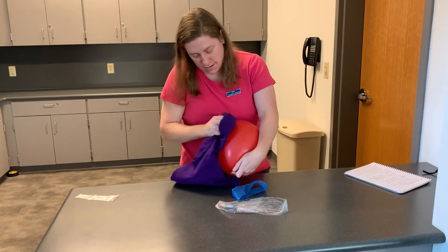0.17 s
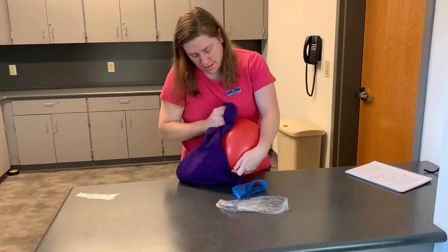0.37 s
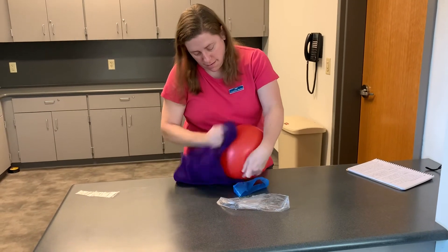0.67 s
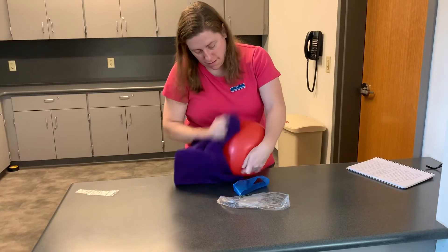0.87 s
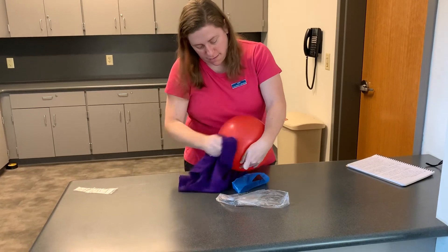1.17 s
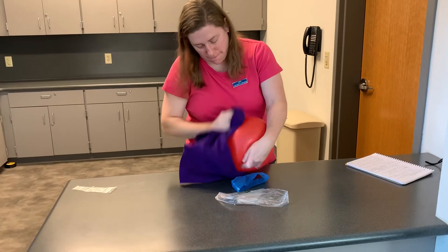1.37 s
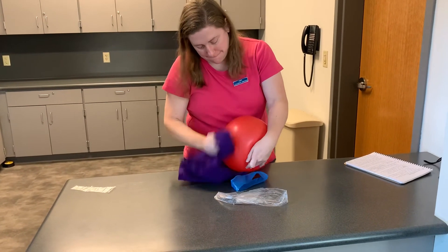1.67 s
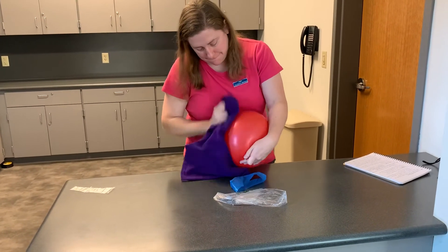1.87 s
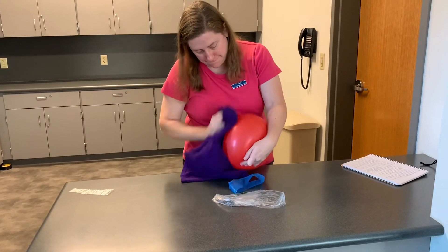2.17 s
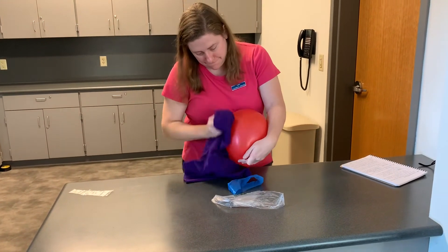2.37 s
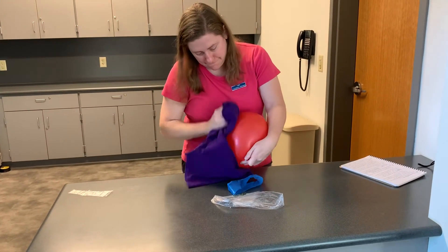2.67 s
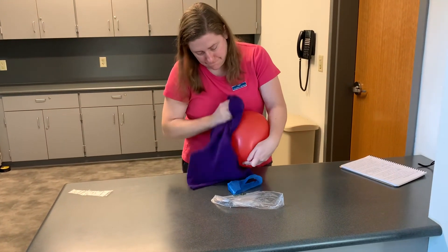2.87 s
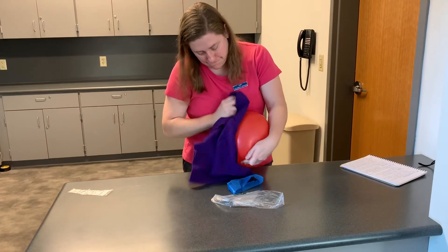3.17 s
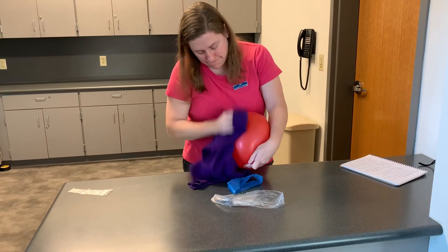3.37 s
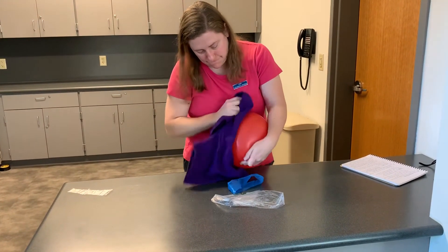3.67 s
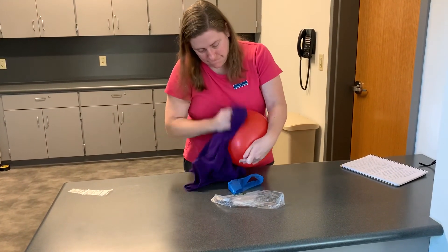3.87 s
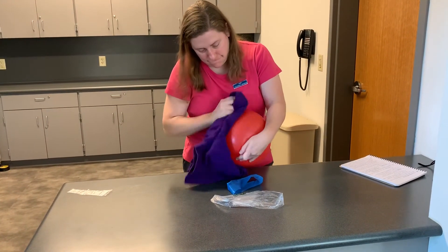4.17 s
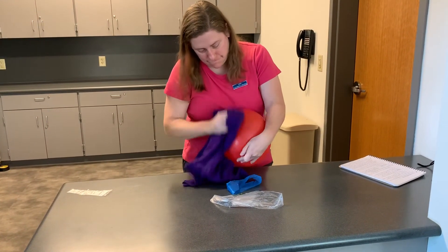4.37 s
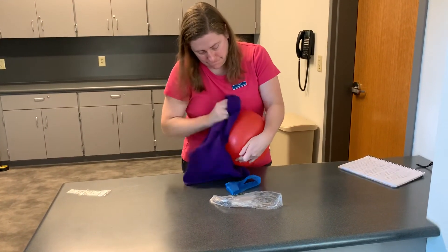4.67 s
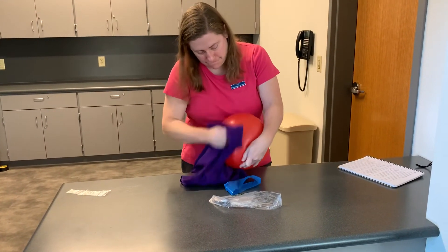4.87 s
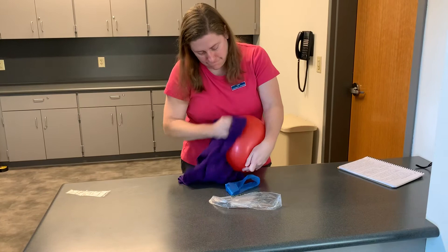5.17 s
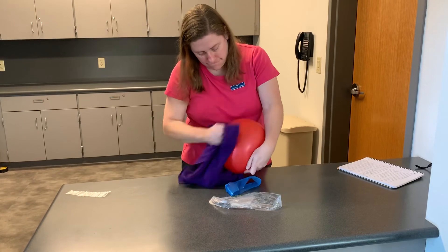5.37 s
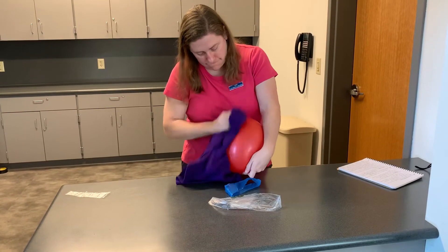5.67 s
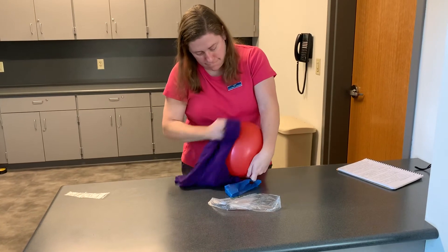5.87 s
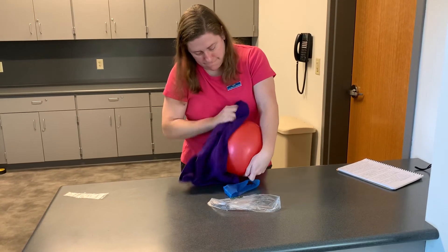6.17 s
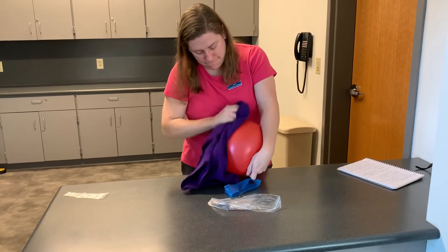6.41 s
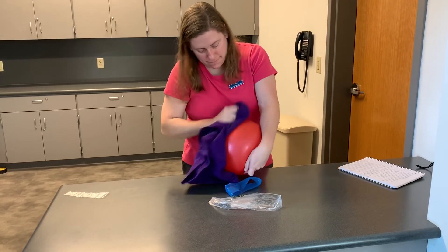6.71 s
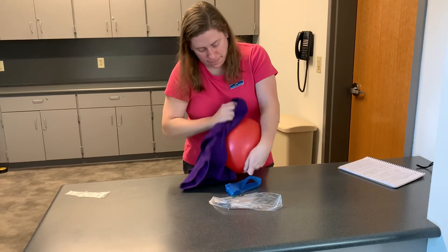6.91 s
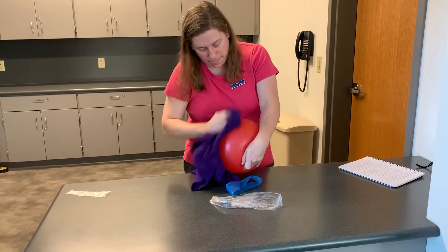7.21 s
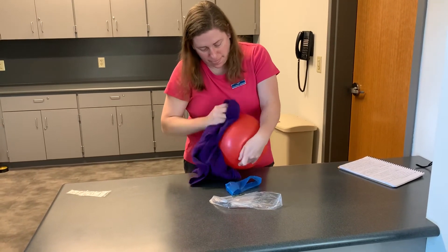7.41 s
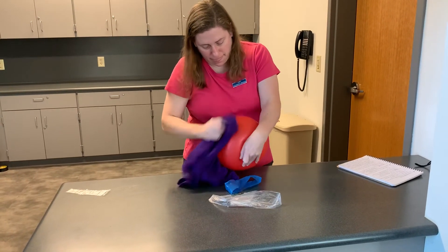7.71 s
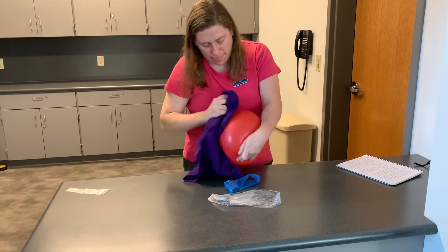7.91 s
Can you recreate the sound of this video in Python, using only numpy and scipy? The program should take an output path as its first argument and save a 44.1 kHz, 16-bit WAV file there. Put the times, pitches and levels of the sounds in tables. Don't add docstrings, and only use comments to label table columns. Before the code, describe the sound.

From 0 to 8 seconds a fleecy towel is rubbed without pause over an inflated balloon, close to a small stereo microphone in a hard kitchen. Soft, bright hissing strokes swing to and fro about eight times a second, uneven in strength, with a hollow scraping and kneading resonance from the taut skin. The opening is a little firmer and quicker, with dull knocks near 0.05, 0.35 and 0.9 seconds, then 1.4 and 2.2. From about 2.2 to 6.8 the loose towel end flaps more often, in low lumpy flutters, while lighter bumps pepper the strokes, clearer around 3.3 and 5.4. The strokes soften slightly late; the strongest hollow knocks land at 7.0 and 7.7. Rubbing continues to the cut. Beneath lie steady ventilation rumble, a short room echo and a barely audible thin electronic whine, swelling near 2.3 and 4.3.

```python
import sys
import numpy as np
from scipy import signal
from scipy.fft import rfft, irfft, next_fast_len
from scipy.io import wavfile
from scipy.ndimage import uniform_filter1d, map_coordinates

SR = 44100
rng = np.random.default_rng(int(sys.argv[2]) if len(sys.argv) > 2 else 0)


def wav_record(signal):
    frames = np.transpose(np.atleast_2d(signal))
    bounded = np.clip(frames, -1, 1)
    quanta = np.round(bounded * 32767).astype(np.int16)
    wavfile.write(sys.argv[1], SR, quanta)


def nominal_scale(level):
    x = np.asarray(level, float) / 20
    return 10 ** x


N = 355004
TIME = np.arange(N) / SR

# middle_s, hiss_db, length_ms, pressure_db
RUBS = [(0.061, -44.0, 47, 4), (0.154, -48.5, 49, 0.4), (0.252, -60, 39, 11), (0.355, -40.5, 37.6, 2.5),
        (0.454, -51.5, 81, 1), (0.576, -45.0, 48, -3.5), (0.708, -47, 46, 1), (0.804, -47, 49, -5),
        (0.921, -43, 38, 3.5), (1.03, -45, 50, -0.1), (1.158, -46.5, 44, 3.8), (1.274, -43, 55, 4.4),
        (1.438, -46, 50, 0.2), (1.558, -44, 57, -2.2), (1.688, -46, 63, 3), (1.812, -48.5, 79, -2),
        (1.964, -47.5, 72, 1.3), (2.094, -44.5, 53, -1.5), (2.238, -46.0, 41, 5), (2.369, -48.5, 65, 1),
        (2.516, -54.5, 46, 6.5), (2.621, -46.0, 54, 2.8), (2.754, -50, 40, 7), (2.874, -47.5, 58, 2.5),
            (3.014, -48.5, 58, 1), (3.137, -45.0, 47, 4.5), (3.279, -46, 57, -1.2), (3.406, -46.0, 51, 0),
            (3.532, -49.5, 51, 0.5), (3.652, -43.5, 47, -3.1), (3.782, -46.5, 46, 2),
            (3.894, -46.5, 56, -1.5), (4.038, -47.5, 47, 0), (4.142, -45.5, 54, -4), (4.279, -43.0, 46, 0),
            (4.406, -44.5, 60, 0.7), (4.551, -46.5, 43, 0.2), (4.668, -44, 54, 1.0), (4.817, -47.5, 52, 2),
            (4.952, -46.5, 69, 2),
        (5.106, -48.0, 56, -0.7), (5.224, -45.0, 57, 0.2), (5.346, -49.0, 50, 2.5),
         (5.444, -44.0, 57, -1.7), (5.585, -50.1, 52, 2), (5.702, -44.5, 56, -2.5), (5.833, -55, 34, 2.5),
         (5.943, -45, 52, -6.5), (6.061, -50, 53, -4.1), (6.172, -44.5, 53, -4), (6.304, -49.5, 48, -0.2),
         (6.41, -47, 47, -2), (6.538, -50.0, 55, 0), (6.656, -47.0, 54, -2), (6.796, -49, 58, 1.5),
         (6.899, -48.3, 50, -1), (7.024, -47.0, 47, 2), (7.128, -49.0, 50, 3.2), (7.262, -47.5, 57, -1.2),
         (7.373, -49.0, 56, -2.2), (7.498, -47, 36, -0.5), (7.596, -47, 59, -5.5), (7.743, -46, 55, 1),
         (7.868, -48.0, 73, 0.5), (8.024, -49.5, 61, 2.5)]
STROKES = RUBS
# pitch_hz, width_hz, level_db
LOW_MODES = [(176, 203, -8), (343, 166, -2.5), (454.4, 58.6, -0.5), (680, 98, -9), (810, 119, -6.5),
             (970, 207, -7.5)]
HIGH_MODES = [(1114, 95, -6), (1378, 86, -1), (1525, 91, 0.5), (1763, 156, -1.5), (2042, 78, -0.5),
              (2252, 96, 0), (2540, 480, -5.5), (4140, 1250, -10)]


def unit(x):
    return x / np.sqrt(np.mean(x ** 2) + 1e-20)


def along(points, hz):
    f, v = np.transpose(points)
    return np.interp(np.log(hz + 1), np.log(f + 1), v)


def curve(rows):
    return np.interp(TIME, *np.transpose(rows))


def wobble(rate_per_s):
    knots = rng.standard_normal(int(N * 1000 / SR) + 4)
    return map_coordinates(knots, [TIME * np.clip(rate_per_s, .1, 999)])


def swells(rows, half_s, rest_db):
    bells = sum(nominal_scale(db) ** 2 * np.exp(-((TIME - s) / half_s) ** 2) for s, db in rows)
    return np.sqrt(nominal_scale(rest_db) ** 2 + bells)


def filtered(x, response):
    m = next_fast_len(N + SR // 2)
    return irfft(rfft(x, m) * response(np.fft.rfftfreq(m, 1 / SR)), m)[..., :N]


def modes(table, order=1):
    def response(f):
        total = 0
        for k, (hz, width, db) in enumerate(table):
            peak = 1j * f * width / (hz * hz - f * f + 1j * f * width)
            total = total + (-1) ** k * nominal_scale(db) * peak ** order
        return total
    return response


def ventilation():
    # pitch_hz, level_db (per Hz)
    rumble = [(18, -31), (29, -2.5), (50, 0.5), (78, -2.5), (100, -5.5), (200, -11), (430, -19),
              (620, -23.5), (1100, -27.5), (2500, -28), (4000, -41), (8000, -39), (16000, -69)]
    # pitch_hz, likeness (0-1)
    alike = [(50, 1), (150, 0.88), (400, 0.86), (800, 0.048), (2000, 0), (8000, 0)]
    # pitch_hz, width_hz, level_db (over the rest)
    duct_modes = [(46, 16.6, -4.5), (75, 13.5, -5), (120, 25, -5)]
    # middle_s, level_db
    whine_swells = [
        (.15, -64),
        (1.4, -68),
        (2.3, -58),
        (4.3, -59),
        (4.9, -61.5),
        (6.3, -66),
    ]

    def duct(f):
        return 1 + sum(nominal_scale(db) * np.exp(-((f - hz) / width) ** 2) for hz, width, db in duct_modes)

    def shape(f):
        turn = np.arccos(np.clip(along(alike, f), -1, 1)) / 2
        return nominal_scale(along(rumble, f)) * duct(f) * [np.cos(turn), np.sin(turn)]

    mid, side = unit(filtered(rng.standard_normal((2, N)), shape))
    air = np.array([mid + side, mid - side]) * nominal_scale([[-.5], [.5]])
    bass = filtered(air, lambda f: 1 / (1 + (f / 120) ** 4) / (1 + (38 / (f + 1)) ** 4))
    rest = air - bass
    throb_db = -47 + 1.56 * wobble(6)
    phase = 2 * np.pi * 8000 * TIME + [[0], [2.6]]
    whine_level = swells(whine_swells, half_s=.25, rest_db=-80) * nominal_scale(1.7 * wobble(6))
    whine = whine_level * np.sin(phase)
    return nominal_scale(throb_db - 1.5) * bass + nominal_scale(-48.5 + 0.75 * wobble(3.01)) * rest + whine


def kitchen(x):
    # pitch_hz, t60_s
    decay = [(200, 0.18), (2000, 0.38), (10000, 0.067)]
    hz, t, z = signal.stft(rng.standard_normal((2, SR // 2)), SR, nperseg=256)
    fade_db = -60 * t / along(decay, hz)[:, None]
    tail = signal.istft(z * nominal_scale(fade_db), SR, nperseg=256)[1]
    tail = tail / np.linalg.norm(tail[0])
    delayed = np.pad(x, (400, 0))[None]
    return signal.fftconvolve(delayed, tail, axes=1)[:, :N]


def friction(grain_db, clump_db, patchy_db):
    z = signal.stft(rng.standard_normal((2, N)), nperseg=512)[2]
    field = uniform_filter1d(rng.standard_normal(z.shape[1:]), size=4, axis=0)
    field = uniform_filter1d(field, size=12, axis=1)
    pair = signal.istft(z * nominal_scale(patchy_db * unit(field)), nperseg=512)[1][:, :N]
    return unit(pair * nominal_scale(grain_db * wobble(700) + clump_db * wobble(70)))


def flapping():
    # middle_s, level_db, high_share (0-1)
    flaps = [(.36, -49, .6), (.97, -47, 0.9), (1.23, -43, .8), (1.99, -47, 0.6), (2.13, -46.5, .2),
             (2.25, -42, 0.87), (2.53, -43.5, .6), (2.77, -42, 0.13), (3.16, -50, .5), (3.43, -44.5, 0.5),
             (3.658, -41, .15), (3.8, -44, .2), (4.33, -46, .5), (4.58, -45, 0.6), (4.93, -41, .8),
             (5.24, -42.5, .6), (5.46, -41, 0.08), (5.66, -43, 0.07), (6.18, -46, 0.55), (6.56, -45.5, .7),
             (6.68, -44, .3), (6.77, -47, 0.55), (7.58, -48, 0.54), (7.76, -48, .4)]
    s, db, high = np.transpose(flaps)
    high = np.interp(TIME, s, np.clip(high, 0, 1))
    lumps = friction(grain_db=-0.1, clump_db=3.0, patchy_db=1.4)
    deep = unit(filtered(lumps, modes([(134, 85, 0)], order=2)))
    slap = unit(filtered(lumps, modes([(214.4, 108, 0)], order=2)))
    level = nominal_scale(-4.0) * swells(zip(s, db), half_s=.024, rest_db=-54)
    return level * (np.sqrt(1 - high) * deep - np.sqrt(high) * slap)


def knocks():
    # start_s, peak_db, thud_db (over the peak), upper_db (over the peak)
    bumps = [(0.049, -29, -22, -5), (0.162, -35, -22, -13), (0.352, -25.5, -14, -24),
             (0.473, -33, -15, -13), (0.575, -34.5, -15, -25), (0.917, -29.5, -8, -9),
             (1.435, -28.5, -15, -24), (1.677, -41, -11, -4), (2.221, -31.5, -9, -14),
             (2.303, -37, -1, -15), (2.748, -33, -5, -17), (3.017, -38, -2, -5), (3.12, -38, -2, -3),
             (3.29, -28, -18, -21), (3.534, -35, -14, -23), (3.636, -36.5, -2, -8), (3.776, -31, -10, -16),
             (3.902, -40, 3, -20), (4.26, -40, 2, -30), (4.381, -34, -4, -25), (4.808, -37, -14, -1),
             (4.926, -34.5, 5.5, -5), (5.205, -37, -5, -13), (5.356, -28, -6, -24), (5.446, -34, -2, -8),
             (5.675, -43.5, 1, -3), (6.398, -43, -18, -0.5), (6.771, -34.5, -2.5, -3),
             (7.011, -24, -20, -8), (7.713, -24.5, -26, -42)]
    contact_ms, rebound_s, rebound_db = 5, .012, -8.5
    t = np.arange(2048) / SR
    push_s = np.array([[.00015], [.0003], [.00012], [.0001]])
    rattle_share = np.array([[.36], [.25], [.3], [.3]])
    pushes = np.zeros((4, N + 2048))

    def push(at_s):
        return np.exp(-((t - at_s) / push_s) ** 2)

    for s, db, thud_db, upper_db in bumps:
        pressing = 1000 * t / contact_ms
        contact = rng.standard_normal(2048) * pressing * np.exp(1 - pressing)
        puff = push(.0011) + nominal_scale(rebound_db) * push(.0011 + rebound_s) + rattle_share * contact
        top_db = -10 + 1.1 * upper_db
        group_db = db + np.array([[0, thud_db, upper_db, top_db]]).T
        start = round(s * SR)
        pushes[:, start:start + len(t)] += nominal_scale(group_db) * puff

    groups = LOW_MODES[2:3], LOW_MODES[:2], LOW_MODES[3:] + HIGH_MODES[:1], HIGH_MODES[1:6]
    damped = [[(hz, 1.65 * width, db) for hz, width, db in group] for group in groups]
    gain = nominal_scale([[17], [15], [22], [15]])
    rung = filtered(pushes[:, :N], lambda f: gain * [modes(g, order=2)(f) for g in damped])
    return np.array([rung.sum(0), rung.T @ [.4, -.3, 0.72, -.9]])


def hand_speed(over_db, rise_shape, fall_shape):
    power = np.zeros(N)
    for (s, db, length_ms, pressure_db), extra_db in zip(STROKES, over_db):
        rise_ms = length_ms * np.clip(0.53 + 0.05 * pressure_db, .2, .8)
        fall_ms = length_ms - rise_ms
        near = slice(max(round((s - .2) * SR), 0), round((s + .2) * SR))
        ms = (TIME[near] - s) * 1000 + length_ms / 2 - rise_ms
        rise = np.abs(ms / rise_ms) ** rise_shape
        fall = np.abs(ms / fall_ms) ** fall_shape
        down = np.where(ms < 0, rise, fall)
        power[near] += nominal_scale(db + extra_db - 4.53 * down) ** 2
    return power


def rubbing():
    # pitch_hz, level_db (per Hz)
    pile = [(1500, -31), (3000, -8), (4500, -5), (5600, -6), (6500, -0.5), (7600, -4.5), (8800, 1),
            (11000, 0), (12600, -2.5), (13800, 1), (15750, -2)]
    # time_s, hiss_db
    drag_level = [
        (0, -59),
        (.4, -62),
        (1.2, -60.5),
        (4.3, -60),
        (5.7, -62),
        (8.05, -61.5),
    ]
    # time_s, scrape_db
    nap = [
        (0, -1),
        (1, -0.5),
        (2.1, -2),
        (2.8, 0.5),
        (4.6, 0.5),
        (5.8, -1),
        (7.2, -1),
        (8.05, 2.5),
    ]
    pressure_db = np.transpose(STROKES)[-1]
    scrape_db = -2 + 0.72 * pressure_db
    boom_db = 3 + 0.75 * pressure_db
    knead_db = 0.59 * boom_db + 0.34 * scrape_db
    drag = nominal_scale(curve(drag_level)) ** 2

    hiss = friction(grain_db=0.05, clump_db=1.04, patchy_db=1.25)
    hiss = unit(filtered(hiss, lambda f: nominal_scale(along(pile, f))))
    hiss_power = hand_speed(0 * boom_db, rise_shape=1.8, fall_shape=2.47)
    hiss = hiss * np.sqrt(nominal_scale(3.5) * hiss_power + nominal_scale(12.0) * drag)

    scrape = friction(grain_db=-2.0, clump_db=2.2, patchy_db=2.1) * nominal_scale(curve(nap))
    scrape_power = hand_speed(scrape_db, rise_shape=1.7, fall_shape=1.39)
    scrape = scrape * np.sqrt(nominal_scale(-11.5) * scrape_power + nominal_scale(-33) * drag)

    knead = friction(grain_db=2.0, clump_db=2.5, patchy_db=1.2)
    knead_power = hand_speed(knead_db, rise_shape=1.66, fall_shape=1.4)
    knead = knead * np.sqrt(nominal_scale(-9.0) * knead_power)

    boom = friction(grain_db=1.0, clump_db=2.5, patchy_db=0.34)
    boom_power = hand_speed(boom_db, rise_shape=1.22, fall_shape=1.68)
    boom = boom * np.sqrt(nominal_scale(-7.5) * boom_power + nominal_scale(-19) * drag)

    def late_air(f):
        return np.exp(-2j * np.pi * f * 0.00697) * modes(LOW_MODES[:3])(f)

    skin = filtered(boom, late_air) + filtered(knead, modes(LOW_MODES[3:]))
    return hiss + nominal_scale(18) * filtered(scrape, modes(HIGH_MODES)) + nominal_scale(23) * skin


def ports(pair):
    # pitch_hz, left_right_db
    shadow = [(300, 0.5), (1100, .5), (2300, -0.5), (3200, 1.5), (4200, -2.5), (5500, -9.5), (6400, 0)]
    # pitch_hz, lead (radians)
    lead_low = [(1700, 0), (2600, 1.58), (3700, 1.22), (5200, 0.1), (5800, 0.13)]
    # pitch_hz, lag (cycles)
    lag_high = [(6500, 0), (8000, .42), (9000, .58), (10600, .94), (11550, 1.06), (12750, 1.43),
                (14000, 1.58), (15250, 1.94), (15800, 2.02)]
    # pitch_hz, share (0-1)
    scatter = [(300, 0.031), (1700, 0.74), (2300, 0.38), (3100, 0.76), (4400, 0.86), (5600, 1),
               (6400, 0.45), (16000, .1)]
    # time_s, left_lead (microseconds / 3)
    sway = [
        (0, -0.8),
        (1.7, -.6),
        (2.9, 0.4),
        (4.3, -.5),
        (5.3, 0),
        (6.6, -.6),
        (7.6, 0.1),
        (8.05, -0.7),
    ]
    sign = np.array([[1], [-1]])

    def split(f):
        turn = np.arcsin(np.clip(along(scatter, f), 0, 1)) / 2
        return np.array([np.cos(turn), np.sin(turn)])

    def port(f):
        lead = along(lead_low, f) - 2 * np.pi * np.interp(f, *np.transpose(lag_high))
        return nominal_scale(along(shadow, f) * sign / 2) * np.exp(.5j * sign * lead)

    shared, scattered = filtered(pair, split)
    heard = filtered(shared + sign * scattered, port)
    slope = filtered(heard, lambda f: 2j * np.pi * f)
    shift_us = 3 * curve(sway) + 2.8 * wobble(10)
    return heard + sign / 2 * slope * 1e-6 * shift_us


def scene():
    balloon = rubbing() + knocks() + flapping()
    to_room = filtered(balloon[0], lambda f: 1 / (1 + (f / 5000) ** 4) / (1 + (330 / (f + 1)) ** 2))
    return ports(balloon) + nominal_scale(-14.0) * kitchen(to_room) + ventilation()


def roll_off(x):
    return signal.sosfilt(signal.butter(12, 17070, fs=SR, output="sos"), x)


def record(dry):
    mix = filtered(dry, lambda f: f < 15770)
    return roll_off(mix)


dry = scene()
out = record(dry)
wav_record(out)
```